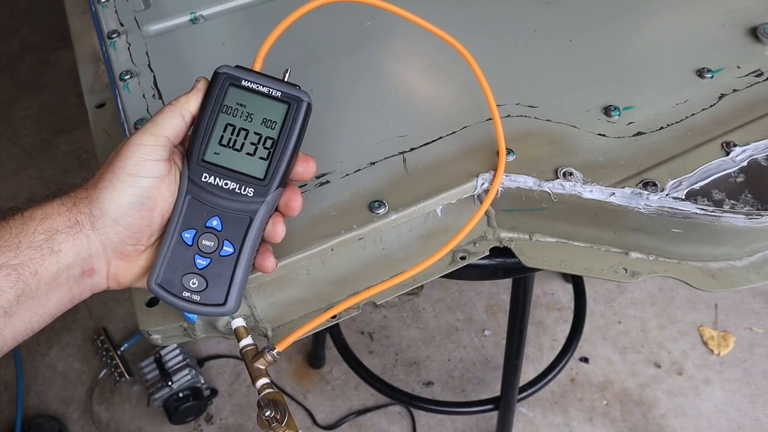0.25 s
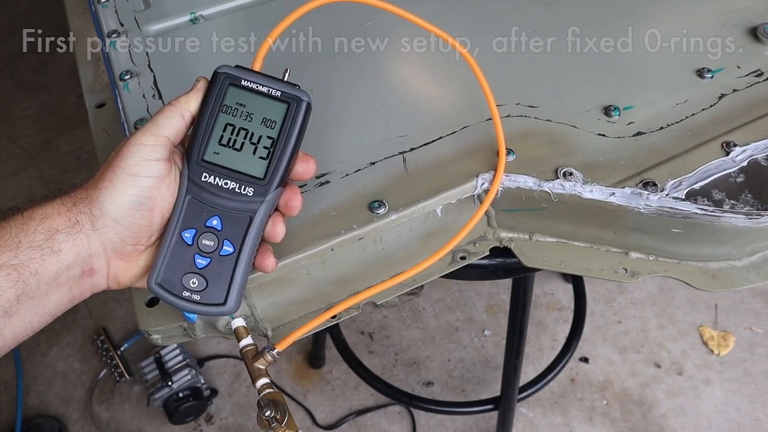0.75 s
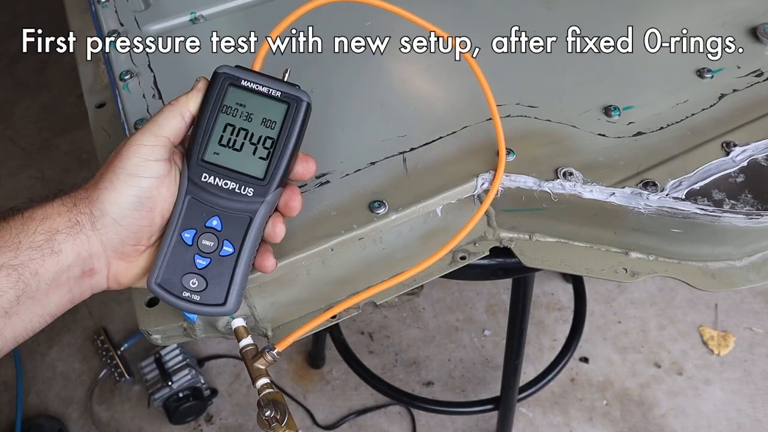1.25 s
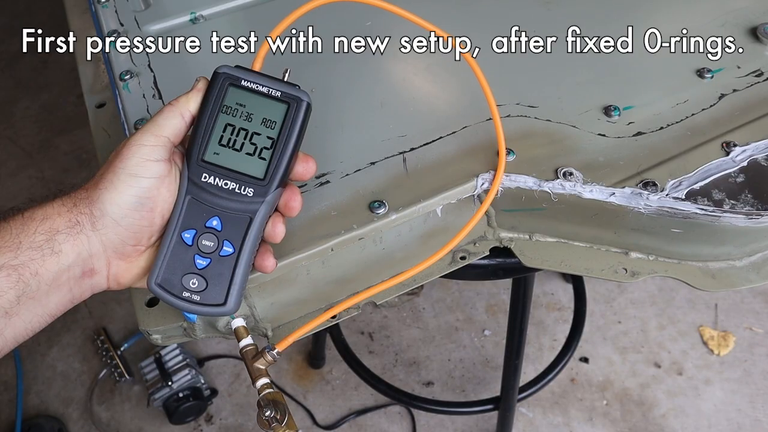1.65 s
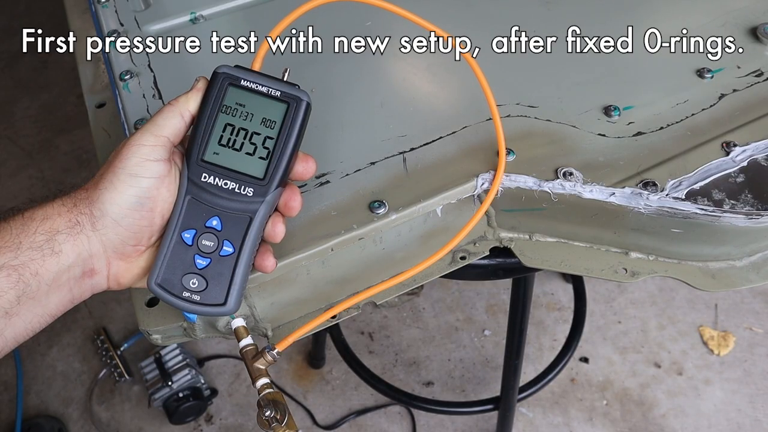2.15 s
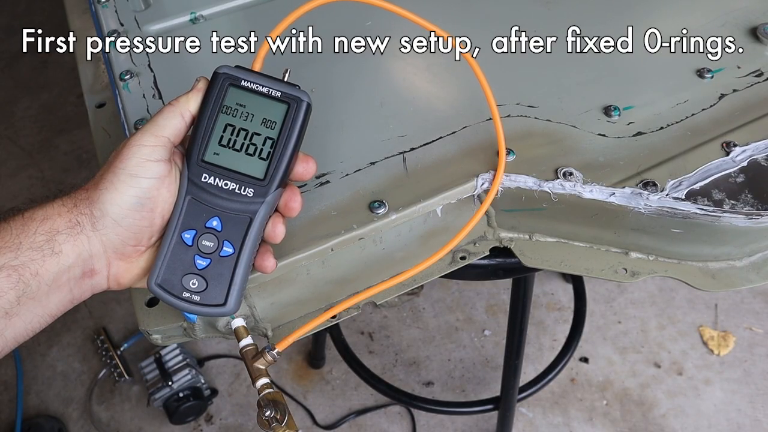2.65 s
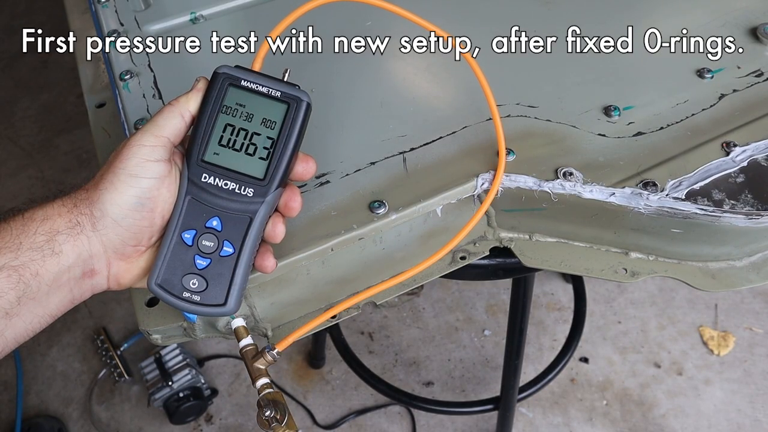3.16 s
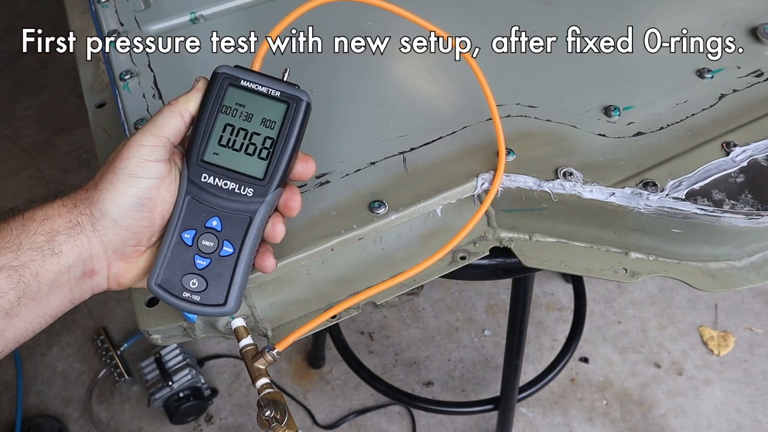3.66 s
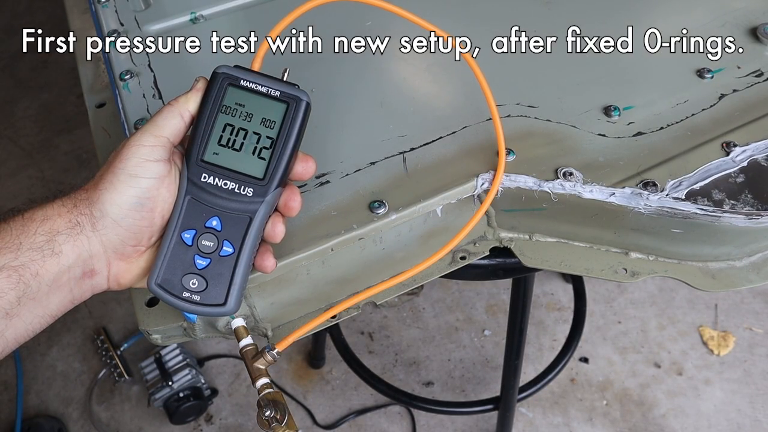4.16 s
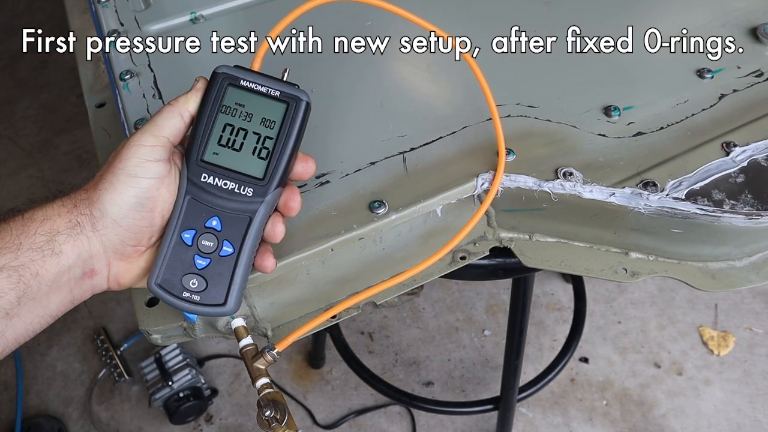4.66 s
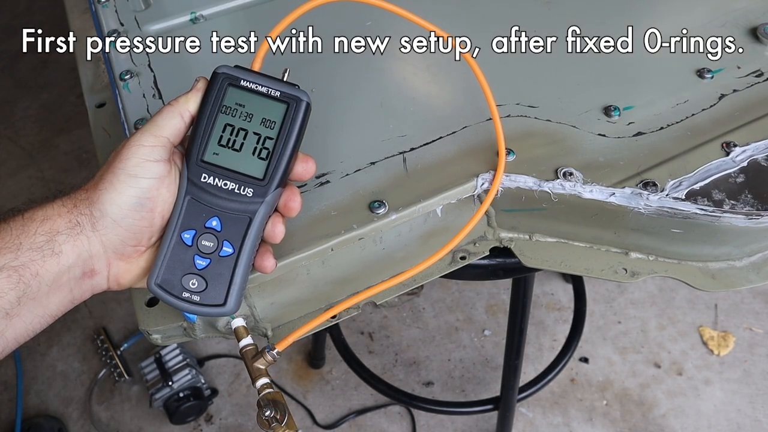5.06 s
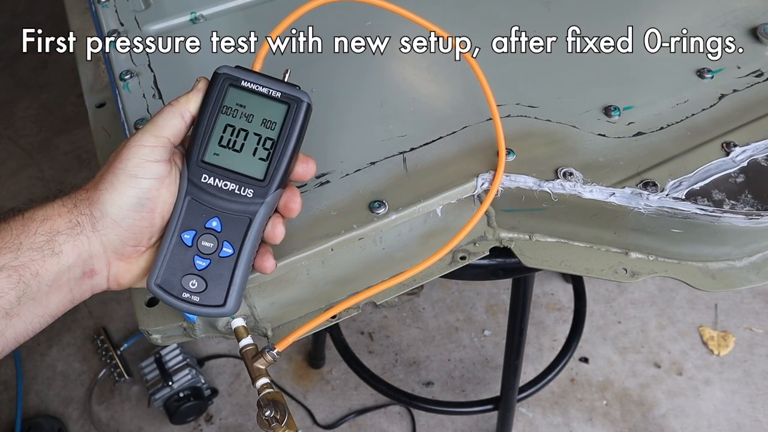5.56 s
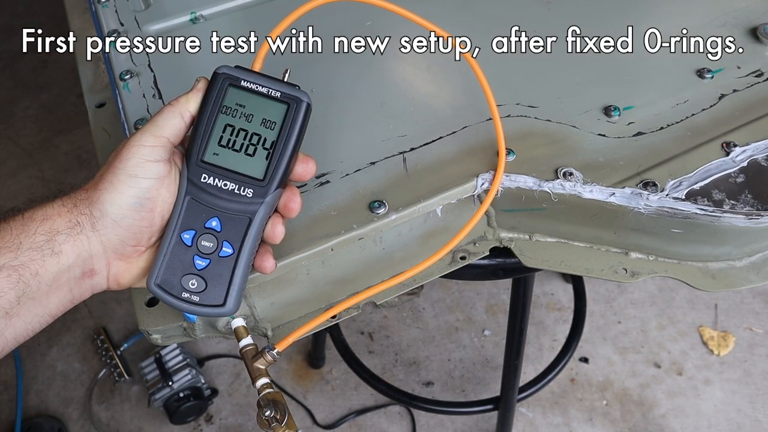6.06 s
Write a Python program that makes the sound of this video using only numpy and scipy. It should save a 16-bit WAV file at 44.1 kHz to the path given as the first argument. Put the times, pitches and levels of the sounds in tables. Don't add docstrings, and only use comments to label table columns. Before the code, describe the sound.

A small electric air pump hums and buzzes steadily in a garage, with faint road noise, trilling insects and a distant piping frog outside.

```python
import sys
import numpy as np
from scipy import signal
from scipy.fft import rfft, irfft, next_fast_len
from scipy.io import wavfile

SR = 44100
rng = np.random.default_rng(int(sys.argv[2]) if len(sys.argv) > 2 else 0)


def inscribe(sig):
    pcm = np.round(np.clip(np.atleast_2d(sig).T, -1, 1) * 32767)
    wavfile.write(sys.argv[1], SR, pcm.astype(np.int16))


def makeup_ratio(level_db):
    decades = np.asarray(level_db, float) / 20
    return 10 ** decades


N = 278271

MAINS_HZ, SLAP_S = 60.017, 0.0160
HUM_DB, SEATING_DB = -46, 1.5
# [multiple of mains, level/dB]
PUMP_ORDERS = [(1, -15.5), (2, 0.5), (3, -11.5), (4, -11), (5, -18.5), (6, -20), (7, -19.5), (8, -22.5),
               (9, -16), (10, -18), (11, -20), (12, -18.5), (13, -25.5), (14, -21), (15, -38.5),
               (16, -47.5)]
ORDER_LAG_CYCLES = {1: .74, 2: .022, 4: .022, 7: .01, 8: .012, 14: .01, 3: .465, 5: .447}
# [f/Hz, level/dB, t60/s]
CASING_MODES = [(1075, -61.5, 0.036), (1436, -57.5, 0.013), (1630, -66, 0.047), (1878, -75, 0.031),
                (2006, -70, 0.019), (2414, -79, 0.037), (2787, -77, 0.033), (3214, -74, 0.021),
                (3560, -81, 0.063), (4070, -78, 0.027), (4400, -73, 0.027), (5880, -65, 0.012),
                (11050, -79, .008)]
# [f/Hz, level/dB, t60/s]
PANEL_MODES = [(2122, -6, 0.019), (2537, -0.5, 0.072), (2990, -6, 0.053)]
# [loose at first/dB, seated/dB, loose again/dB, seats t/s, loosens t/s]
PANEL_FIT = [(-72, -84, -74, 1, 4.8), (-84, -86, -77.5, 1.0, 5.36), (-75.5, -81.5, -74, 0.69, 4.26)]
PANEL_SETTLE_S, PANEL_RATTLE_DB = 0.25, 1
# [f/Hz, level/dB]
JET_SPECTRUM = [(2000, -29), (5000, 0), (9000, -11), (11500, -1), (12700, -2), (13100, -12), (15500, -14)]

FAN_HZ, FAN_DB, FAN_NULL_S = 56.53, -69, 2.485

# [f/Hz, level/dB]
ROAR_SPECTRUM = [(200, -32), (310, -15), (500, -22), (800, 3.5), (1050, -0.5), (1400, 2), (1700, -4),
                 (1900, -26.5), (2600, -33)]
# [f/Hz, level/dB]
RUMBLE_SPECTRUM = [(25, -23), (45, -13), (58, -2.5), (100, 3), (170, -1.5), (250, -10.5), (400, -13),
                   (550, -12.5), (750, -9.5), (1000, -8.5), (1500, -47)]
# [closest t/s, half-power time/s, roar level/dB, engine level/dB, tyre whine over roar/dB]
VEHICLES = [
    (1.3, 0.43, -64, -90, -1),
    (2.6, 0.36, -59.5, -67, 1.5),
    (3.2, 0.34, -64, -71, 5.5),
    (4.4, 0.56, -63.5, -82, -0.5),
    (5.0, 0.24, -67, -70.5, 4.5),
    (6.0, 0.45, -66, -81, 5.5),
]
ROAD_DB, ROAD_WHINE_DB, WHINE_WAVER_DB = -66, -66, 0.8
ENGINE_HZ, ENGINE_WIDTH_HZ, ENGINE_AFTER_S = 299, 160, 0.15

# [f/Hz, level/dB]
CHORUS_SPECTRUM = [(1060, -38), (1800, -0.5), (2270, -3), (2560, -4.5), (2770, -8.5), (3120, -8.5),
                   (3760, -8), (4310, -5), (6400, 1), (6940, -1.5), (7730, -6.5), (9680, -17.5),
                   (12700, -35), (14300, -33), (15500, -45)]
WASH_DB, WASH_SWELL_DB, WASH_WEAKEST_S, WASH_SWELL_S = -68, 0.63, 4.3, 6.1
TRILL_DB, TRILL_FADE_DB_PER_S, TRILL_WAVER_DB = -71.5, 0.34, 0.9
CHIRP_DB, CHIRP_FADE_DB_PER_S, CHIRP_REST_S, CHIRP_REST_LENGTH_S = -81.5, 0.4, 3.78, 0.17

# [start t/s, pips, gap/s, peak level/dB, first f/Hz]
FROG_PHRASES = [
    (1.436, 5, .0645, -61, 2270),
    (1.762, 2, .069, -65, 2390),
    (1.909, 8, .078, -64, 2290),
    (2.531, 10, .0728, -64, 2320),
    (3.275, 2, .078, -66, 2560),
    (4.130, 6, .0705, -64, 2285),
    (5.314, 1, .07, -63, 2310),
    (5.663, 2, .097, -63, 2500),
    (2.531, 1, .07, -66, 2480),
]
PIP_RISE_HZ_PER_S, PIP_SPREAD_HZ, PIP_SPREAD_DB, PIP_SWELL_DB = 50, 8, 0.8, 7
UPPER_TONE_FROM_S, UPPER_TONE_GROWS_PER_S = 1.5, 0.86

# [start t/s, length/s, from f/Hz, to f/Hz, level/dB]
TYRE_GLIDES = [
    (2.58, 0.34, 1240, 1385, -66.5),
    (2.40, 0.14, 975, 1060, -61),
    (2.9, 0.14, 975, 1000, -60.5),
    (2.7, 0.22, 985, 995, -64),
    (4.97, 0.07, 1000, 1020, -59),
]

PORT_POLE_HZ, PORT_ZERO_HZ, PORT_DB, PORT_LEAK_HZ = 172, 1080, -13, 22
SELF_NOISE_DB, MONO_ABOVE_HZ = -93.5, 12900
# [f/Hz, level/dB]
HISS_SPECTRUM = [(3000, -45), (7000, -12), (10000, -1), (12700, 0), (13100, -10), (16000, -8)]


def rms_one(x):
    return x / np.sqrt(np.mean(x ** 2) + 1e-20)


def drift(rate):
    r = np.exp(-80 * np.pi * rate / SR)
    noise = rng.standard_normal(N // 40 + 2002)
    slow = signal.lfilter([1], [1, -2 * r, r * r], noise)[2000:]
    return np.interp(np.arange(N) / 40, np.arange(len(slow)), rms_one(slow))


def coloured(spectrum):
    size = next_fast_len(N)
    hz, level_db = np.transpose(spectrum)
    bins_hz = np.arange(1, size // 2 + 2) * SR / size
    shape_db = np.interp(np.log(bins_hz), np.log(hz), level_db)
    return rms_one(irfft(rfft(rng.standard_normal(size)) * makeup_ratio(shape_db), size)[:N])


def ring(clicks, hz, t60):
    r, w = makeup_ratio(-60 / (t60 * SR)), 2 * np.pi * hz / SR
    return signal.lfilter([0, np.sin(w)], [1, -2 * r * np.cos(w), r * r], clicks + 1e-18)


def whistle(hz, width_hz):
    t60 = np.log(1000) / (np.pi * width_hz)
    once = ring(rng.standard_normal(N), hz, t60)
    return rms_one(ring(once, hz, t60))


def throb(rate_hz, first_s, sharp, wander):
    turns = rate_hz * (np.arange(N) / SR - first_s) + wander * drift(0.61)
    return np.exp(sharp * (np.cos(2 * np.pi * turns) - 1))


def step(at_s, width_s):
    return 0.5 + 0.5 * np.tanh((np.arange(N) / SR - at_s) / width_s)


def panel_looseness():
    levels_db = []
    for first_db, seated_db, again_db, seats_s, loosens_s in PANEL_FIT:
        before = (first_db - seated_db) * (1 - step(seats_s, PANEL_SETTLE_S))
        after = (again_db - seated_db) * step(loosens_s, PANEL_SETTLE_S)
        levels_db.append(seated_db + before + after + PANEL_RATTLE_DB * drift(1.4))
    return levels_db


def pump():
    cycles = MAINS_HZ * (np.arange(N) / SR - SLAP_S)
    count = int(cycles[-1]) + 3
    luck = rng.standard_normal((count, 2))
    near_slap = np.exp(10 * (np.cos(2 * np.pi * cycles) - 1))
    force = makeup_ratio(0.59 * near_slap * np.interp(cycles + 1, np.arange(count), luck[:, 0]))
    late_cycles = 0.0019 * near_slap * np.interp(cycles + 1, np.arange(count), luck[:, 1])
    out = np.zeros(N)
    for multiple, level_db in PUMP_ORDERS:
        k = round(multiple)
        turns = cycles - ORDER_LAG_CYCLES.get(k, 0) - late_cycles * (k > 5)
        level = makeup_ratio(HUM_DB + level_db + 0.11 * drift(8)) * (force if k > 5 else 1)
        out += level * np.sqrt(2) * np.cos(2 * np.pi * k * turns)
    slaps = (np.diff(np.floor(cycles), prepend=-1) > 0) * force
    for hz, level_db, t60 in CASING_MODES:
        path_s = rng.uniform(0, 0.005)
        blows = np.roll(slaps, int(path_s * SR))
        out += ring(blows * makeup_ratio(level_db + SEATING_DB * drift(0.63)), hz, t60)
    for loose_db, (hz, level_db, t60) in zip(panel_looseness(), PANEL_MODES):
        out += makeup_ratio(loose_db + level_db) * rms_one(ring(slaps, hz, t60))
    puff = np.exp(-(cycles % 1) / 0.17) + 0.54 * np.exp(-((cycles + 0.5) % 1) / 0.16)
    return out + makeup_ratio(-78) * puff * coloured(JET_SPECTRUM)


def fan():
    swing_at_null = MAINS_HZ * (FAN_NULL_S - SLAP_S) - ORDER_LAG_CYCLES[1]
    turns = FAN_HZ * (np.arange(N) / SR - FAN_NULL_S) + swing_at_null + 0.5
    return makeup_ratio(FAN_DB) * np.sqrt(2) * np.cos(2 * np.pi * turns)


def passing(at_s, half_s, level_db):
    return makeup_ratio(2 * level_db) / (1 + ((np.arange(N) / SR - at_s) / half_s) ** 2)


def traffic():
    roar_power, tyre_power, engine_power = makeup_ratio(2 * ROAD_DB), makeup_ratio(2 * ROAD_WHINE_DB), 0
    for at_s, half_s, roar_db, engine_db, over_db in VEHICLES:
        roar_power = roar_power + passing(at_s, half_s, roar_db)
        tyre_power = tyre_power + passing(at_s, half_s, roar_db + over_db)
        engine_power = engine_power + passing(at_s + ENGINE_AFTER_S, half_s, engine_db)
    whines = whistle(996.4, 40) + 0.65 * whistle(1033.6, 35) + 0.49 * whistle(1200, 35)
    whines += 0.68 * whistle(1071, 45) * makeup_ratio(0.55 * drift(9.3))
    whines += 0.5 * whistle(1303, 70) * makeup_ratio(1.1 * drift(5.5))
    whines *= makeup_ratio(-8.5 + WHINE_WAVER_DB * drift(11))
    rumble = makeup_ratio(-60 + 0.9 * drift(2)) * coloured(RUMBLE_SPECTRUM)
    roar = np.sqrt(roar_power) * makeup_ratio(-2.5 + 0.26 * drift(16)) * coloured(ROAR_SPECTRUM)
    engine = np.sqrt(engine_power) * whistle(ENGINE_HZ, ENGINE_WIDTH_HZ)
    return rumble + roar + np.sqrt(tyre_power) * whines + engine


def insects():
    t = np.arange(N) / SR
    wash_db = WASH_DB - WASH_SWELL_DB * np.cos(2 * np.pi * (t - WASH_WEAKEST_S) / WASH_SWELL_S)
    trill_db = TRILL_DB - TRILL_FADE_DB_PER_S * t + TRILL_WAVER_DB * drift(0.67)
    rest_db = -12 * np.exp(-((t - CHIRP_REST_S) / CHIRP_REST_LENGTH_S) ** 2)
    chirp_db = CHIRP_DB - CHIRP_FADE_DB_PER_S * t + rest_db
    wash = makeup_ratio(wash_db + 0.8 + 0.43 * drift(15)) * coloured(CHORUS_SPECTRUM)
    trill = makeup_ratio(trill_db + 1) * whistle(6880, 220) * throb(42.5, 0.0074, sharp=0.32, wander=0.15)
    upper = makeup_ratio(-78.5) * whistle(7166, 200)
    wing = np.sqrt(2) * np.sin(2 * np.pi * np.cumsum(8180 + 35 * drift(3)) / SR)
    chirp = makeup_ratio(chirp_db + 3 + 0.8 * drift(10)) * wing * throb(16.3, 0.05, sharp=2.9, wander=0.1)
    drone = makeup_ratio(-85 + 0.43 * drift(4.7)) * whistle(3100, 75)
    return wash + trill + upper + chirp + drone


def frog():
    out, t = np.zeros(N + SR), np.arange(1500) / SR
    swell = t / 0.0051 * np.exp(1 - t / 0.006)
    for start_s, pips, gap_s, peak_db, first_hz in FROG_PHRASES:
        luck = rng.standard_normal((12, 2))
        for k in range(round(pips)):
            at = round((start_s + k * gap_s) * SR)
            hz = first_hz + PIP_RISE_HZ_PER_S * k * gap_s + PIP_SPREAD_HZ * luck[k, 0]
            warmth = np.clip(UPPER_TONE_GROWS_PER_S * (at / SR - UPPER_TONE_FROM_S), 0, 1)
            upper = warmth * (pips > 4)
            arch_db = -PIP_SWELL_DB * (2 * (k + 0.5) / pips - 0.8) ** 2
            level_db = peak_db - 7.5 + arch_db + PIP_SPREAD_DB * luck[k, 1]
            tones = np.sin(2 * np.pi * hz * t) + upper * np.sin(2 * np.pi * 1.058 * hz * t)
            out[at:at + len(t)] += makeup_ratio(level_db) * tones * swell
    return out[:N]


def tyre_notes():
    out = np.zeros(N + SR)
    for start_s, length_s, from_hz, to_hz, level_db in TYRE_GLIDES:
        part = np.arange(round(length_s * SR)) / (length_s * SR)
        glide_hz = from_hz + (to_hz - from_hz) * (3 - 2 * part) * part ** 2
        tone = np.sqrt(2) * np.sin(2 * np.pi * np.cumsum(glide_hz) / SR)
        at = round(start_s * SR)
        out[at:at + len(part)] += makeup_ratio(level_db) * np.sin(np.pi * part) * tone
    return out[:N]


def scene():
    return np.tile(pump() + fan() + traffic() + insects() + frog() + tyre_notes(), (2, 1))


def roll_off(x):
    return signal.sosfilt(signal.butter(12, 15720, fs=SR, output="sos"), x)


def record(dry):
    pole, zero, g = 2 * np.pi * PORT_POLE_HZ, 2 * np.pi * PORT_ZERO_HZ, makeup_ratio(PORT_DB)
    both = [1 + g, pole + g * zero]
    left = signal.lfilter(*signal.bilinear([2, 2 * pole], both, SR), dry[0])
    right = signal.lfilter(*signal.bilinear([2 * g, 2 * g * zero], both, SR), dry[1])
    right = signal.lfilter(*signal.butter(1, PORT_LEAK_HZ, "high", fs=SR), right)
    hiss = [coloured(HISS_SPECTRUM) for part in range(3)]
    hiss = np.array(hiss[:2]) + 0.93 * makeup_ratio(1.6 * drift(11)) * hiss[2]
    left, right = np.array([left, right]) + makeup_ratio(SELF_NOISE_DB) * hiss
    stereo_bins = np.arange(N // 2 + 1) * SR / N < MONO_ABOVE_HZ
    side = irfft(rfft(left - right) * stereo_bins, N) / 2
    return roll_off((left + right) / 2 + side * [[1], [-1]])


dry = scene()
out = record(dry)
inscribe(out)
```